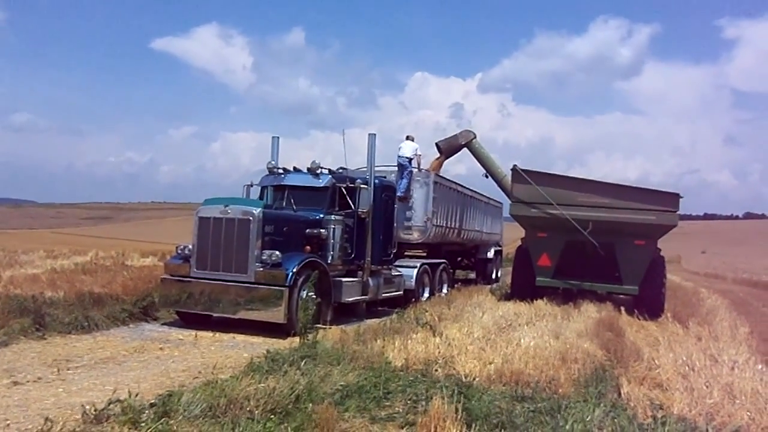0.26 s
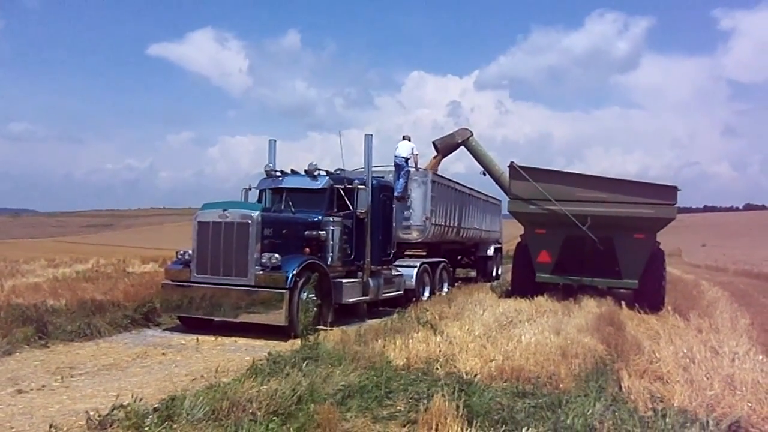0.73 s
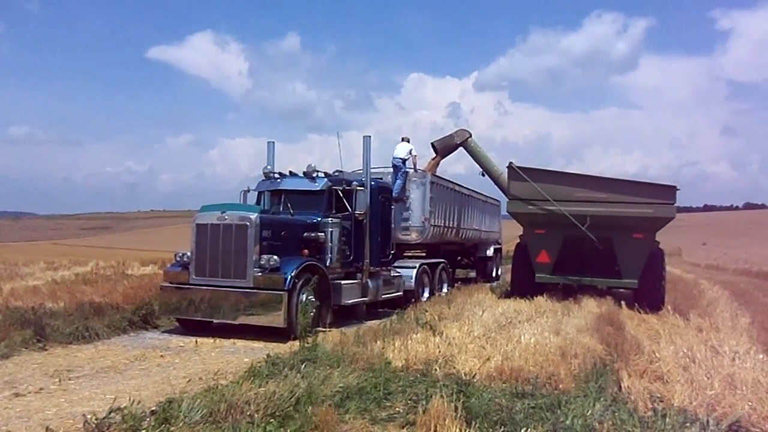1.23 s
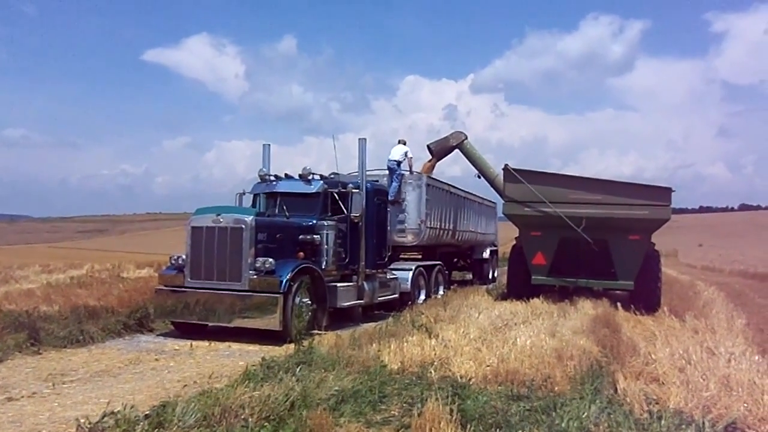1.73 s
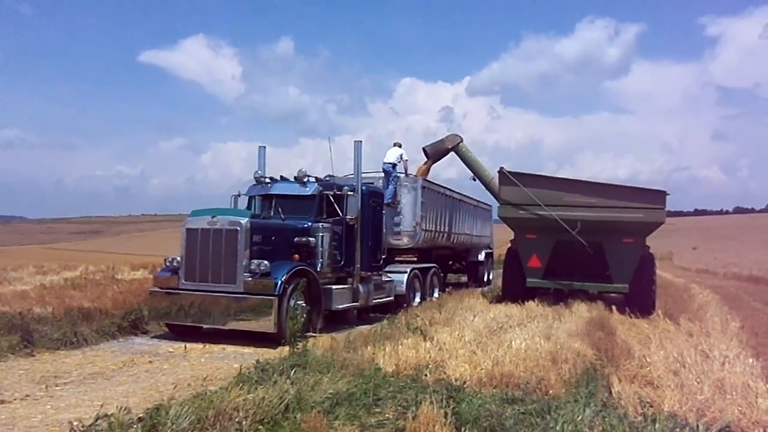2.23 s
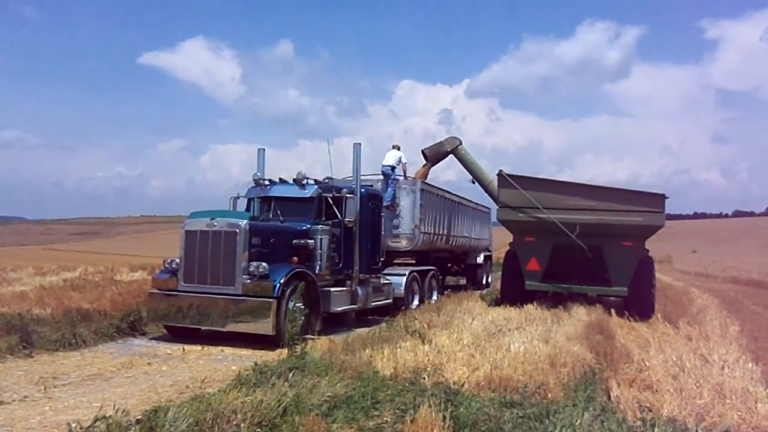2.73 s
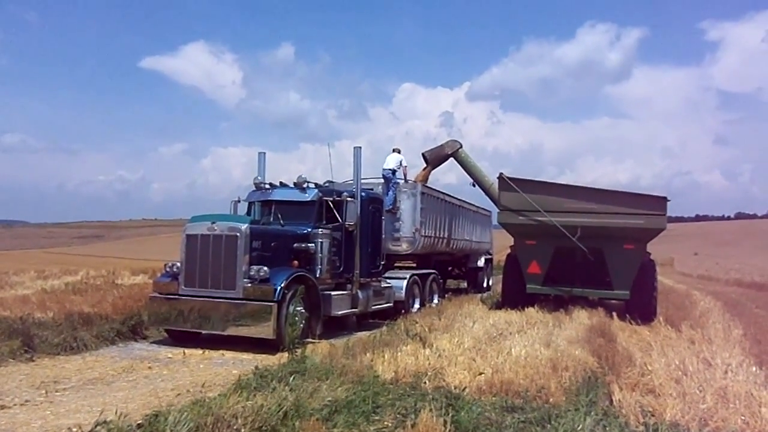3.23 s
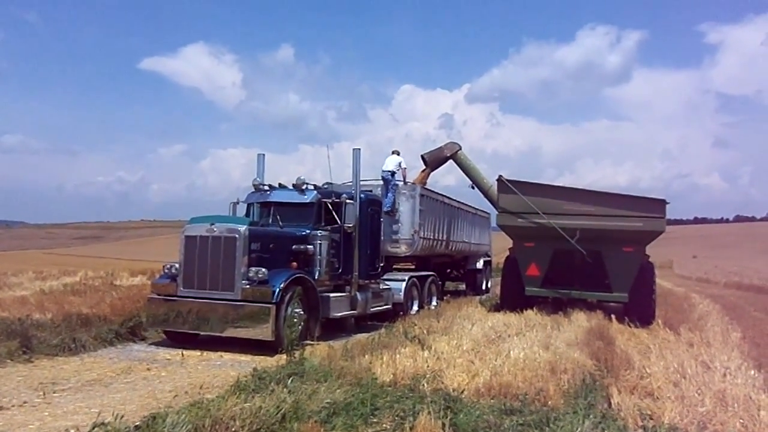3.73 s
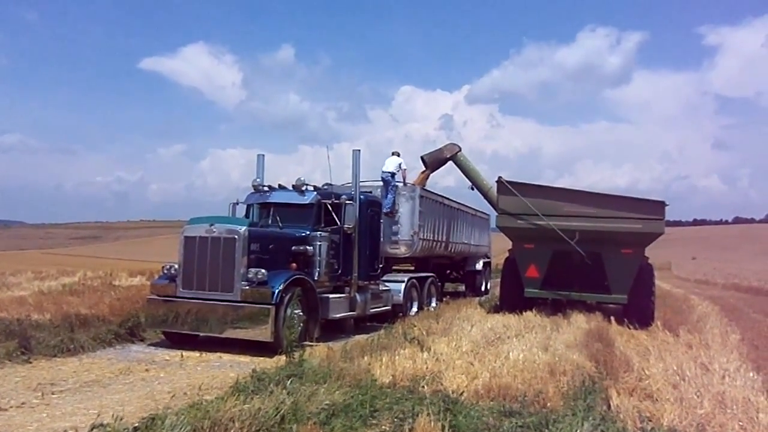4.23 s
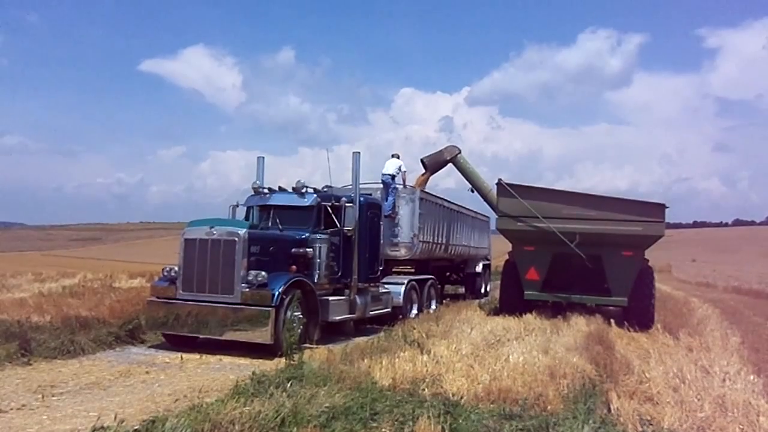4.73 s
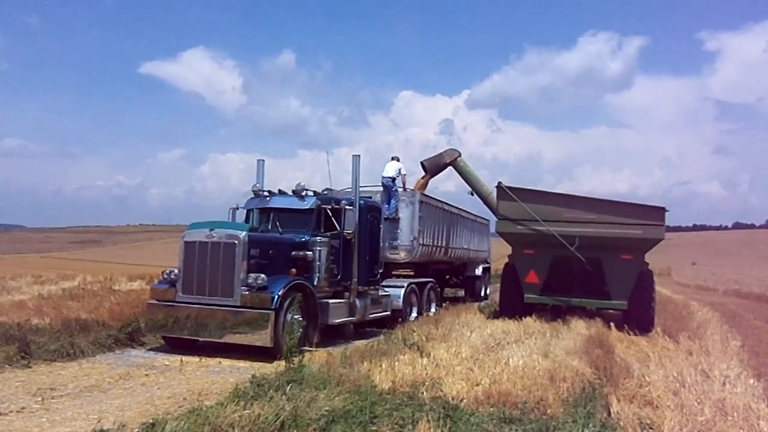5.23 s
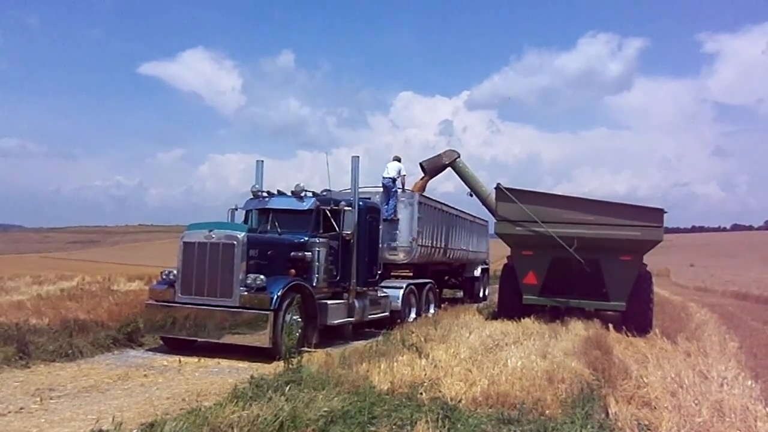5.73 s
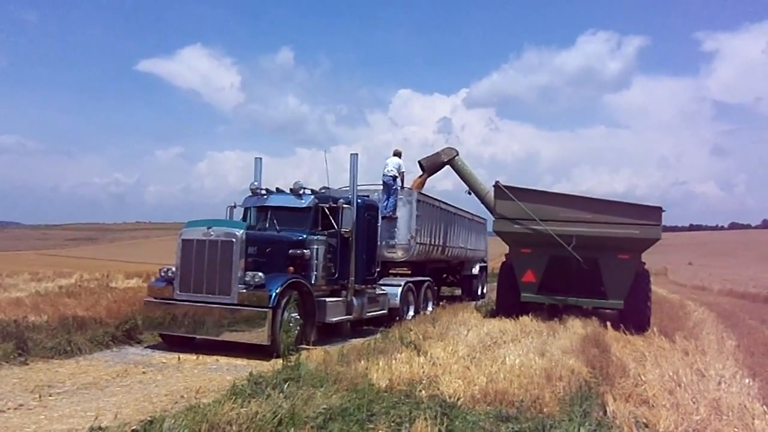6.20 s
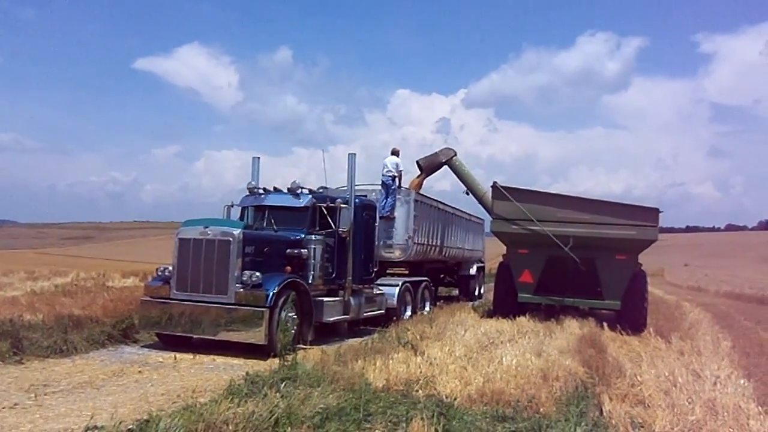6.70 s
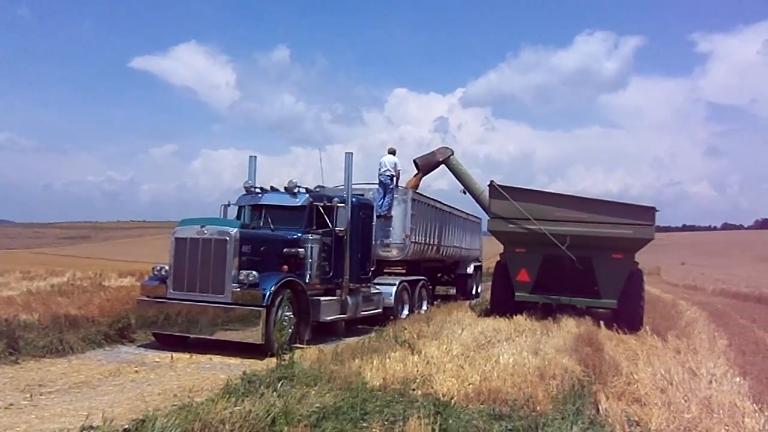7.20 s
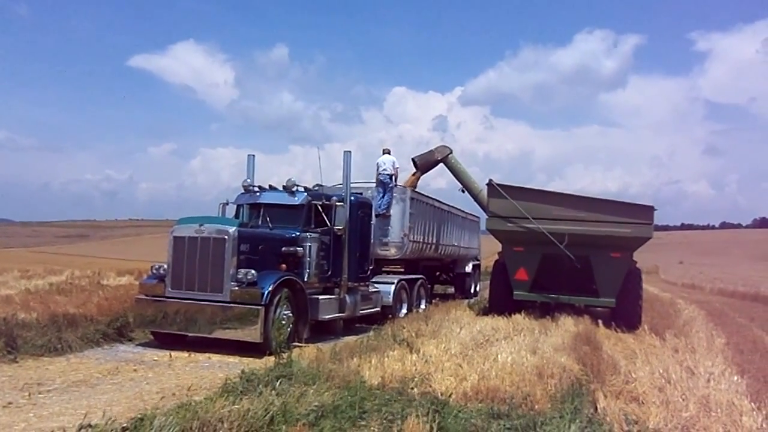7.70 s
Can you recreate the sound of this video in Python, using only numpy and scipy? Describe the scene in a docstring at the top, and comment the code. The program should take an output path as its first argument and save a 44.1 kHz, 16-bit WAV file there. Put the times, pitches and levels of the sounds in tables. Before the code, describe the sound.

A continuous outdoor machinery bed: bright flickering grain hiss, rattling diesel knock, low beating hum from truck and tractor, faint pump and gear whines. Low wind rumble and blunt pressure thumps hit the bare single microphone from the start, with a distorted burst near two and a half seconds. By three seconds the machines sound softer, their deep hum reduced less, and they keep running.

```python
"""A grain cart empties wheat into a truck trailer in an open field, heard on one microphone.
From the start grain hisses as flickering noise, the truck's six-cylinder diesel clatters as struck resonances,
gears, pumps and fans whine, and two engines drone as harmonic sines, the tractor firing faster than the truck.
Wind noise buffets the bare microphone throughout; thumps of pressure begin within half a second and are
strongest near 2.4 s. Between 1.9 and 3 s the machines sink in level, their deep tones less than the rest."""
import sys
import numpy as np
from scipy import signal
from scipy.io import wavfile
from scipy.ndimage import uniform_filter1d

SR = 44100
rng = np.random.default_rng(int(sys.argv[2]) if len(sys.argv) > 2 else 0)


def store_pcm(level_fs):
    """Save levels as 16-bit WAV."""
    pcm = np.round(np.clip(level_fs, -1, 1) * 32767).astype(np.int16)
    wavfile.write(sys.argv[1], SR, np.atleast_2d(pcm).T)


N = 350595

# firing rate [Hz] and time of the first firing [s]
TRUCK_FIRING_HZ, TRUCK_FIRST_S = 32.472, .0165
TRACTOR_FIRING_HZ, TRACTOR_FIRST_S = 75.975, .0021


def amp(db):
    """Level to amplitude ratio: 20 dB are a factor of ten."""
    return 10 ** (np.asarray(db) / 20)


def rms_one(x):
    """Normalization of signal power: scale to rms 1."""
    return x / np.sqrt(np.mean(x ** 2) + 1e-20)


def in_time(rows):
    """Linear interpolation: the columns of a curve at every sample."""
    s, *columns = np.transpose(rows)
    return [np.interp(np.arange(N) / SR, s, c) for c in columns]


def drift(rate_hz):
    """Low-pass random fluctuation: noise through two equal poles at rate_hz, rms 1."""
    step = 40   # samples between the computed points
    r = np.exp(-2 * np.pi * rate_hz * step / SR)
    white = rng.standard_normal(N // step + 2002)
    slow = signal.lfilter([1], [1, -2 * r, r * r], white)[2000:]   # drop the filter's settling
    return np.interp(np.arange(N) / step, np.arange(len(slow)), rms_one(slow - slow.mean()))


def resonance(x, hz, width_hz):
    """Damped resonator: a pole pair with gain 1 at its peak; the damping sets the width."""
    r = np.exp(-np.pi * width_hz / SR)
    zeros = np.array([1, 0, -1]) * (1 - r * r) / 2
    poles = [1, -2 * r * np.cos(2 * np.pi * hz / SR), r * r]
    return signal.lfilter(zeros, poles, x)


def band(x, low_hz, high_hz):
    """Band limitation by a Butterworth filter."""
    return signal.sosfilt(signal.butter(2, [low_hz, high_hz], "band", fs=SR, output="sos"), x)


def evened(x, span_s):
    """Envelope normalization: noise with its slow swells divided out."""
    return x / np.sqrt(uniform_filter1d(x ** 2, int(span_s * SR)) + 1e-12)


def patchy_noise(spectrum, shared_db, own_db):
    """Modulated noise: third-octave bands flicker partly together and partly alone; rms 1."""
    hz, level_db = np.transpose(spectrum)
    edges = hz[0] * 2 ** np.arange(0, np.log2(hz[-1] / hz[0]) + 1 / 3, 1 / 3)
    white, together, out = rng.standard_normal((2, N)), drift(4.6), 0
    for k, (low, high) in enumerate(zip(edges, edges[1:])):
        centre_db = np.interp(np.log(low * high) / 2, np.log(hz), level_db)
        gain = amp(centre_db + shared_db * together + own_db * drift(17.0))
        out = out + gain * band(white[k % 2], low, high)   # neighbours draw on different noise
    return rms_one(out)


def orders(hz, first_s, table, waver_db, wander_turns, sink_db=0):
    """Harmonics of a periodic source: sines on multiples of one wandering phase, each wavering in level."""
    spared_below_hz = 135.   # deep tones take a smaller share of the sink
    turns = hz * (np.arange(N) / SR - first_s) + wander_turns * drift(0.98)
    out = 0
    for k, db in table:
        share = 1 / (1 + (spared_below_hz / (k * hz)) ** 2)
        level = amp(db + share * sink_db + waver_db * drift(1.55))
        out = out + level * np.cos(2 * np.pi * round(k) * turns)
    return np.sqrt(2) * out   # rms to peak


def grain_stream():
    """Random superposition: the many impacts of falling wheat add up to flickering noise."""
    # spectrum of the wheat stream: (frequency [Hz], relative density [dB per Hz])
    spectrum = [(1700, -23), (2300, -8), (2700, -3.5), (3600, -4.5), (4500, 0.5), (6400, 0), (7800, -2.5),
                (8800, -10.5), (11000, -5), (16000, -19)]
    return amp(0.56) * patchy_noise(spectrum, shared_db=0.56, own_db=0.66)


def knocks(knock_s, spread_db):
    """Impulsive excitation: a short swell at each truck firing, uneven by cylinder and by chance; rms 1."""
    # strength of each cylinder in firing order: [dB]
    cylinders_db = [-6, -3, 0, -7, -5, -1]
    at = np.arange(TRUCK_FIRST_S, N / SR - .01, 1 / TRUCK_FIRING_HZ)
    chance = np.minimum(rng.standard_normal(len(at)), 1.4)
    firing = np.zeros(N)
    firing[(at * SR).astype(int)] = amp(np.resize(cylinders_db, len(at)) + spread_db * chance)
    r = np.exp(-1 / (knock_s * SR))   # each swell peaks after knock_s
    return rms_one(signal.lfilter([1], [1, -2 * r, r * r], firing))


def clatter(steady, roar_depth):
    """Modal excitation: noise rings the block, harder at each firing, over a roar that pulses slightly."""
    # engine block and panels: (frequency [Hz], noise bandwidth [Hz], relative level [dB], knock spread [dB])
    modes = [(427, 108, -6, 5.5), (637, 85, -0.5, -4), (922, 122, -3, -2), (1085, 95, -2, 5),
             (1450, 157, -6.5, 5), (1962, 170, -8.5, 3.5), (3040, 216, -10, 9.5)]
    # engine and auger noise: (frequency [Hz], relative density [dB per Hz])
    roar_spectrum = [(50, -19), (90, -10.5), (160, -4), (230, -18.5), (340, -21), (600, -11.5), (1100, -16),
                     (1300, -17.5), (2000, -21), (2300, -34.5), (3200, -55)]
    white, block = rng.standard_normal(N), 0
    for k, (hz, width_hz, db, spread_db) in enumerate(modes):
        shaking = white * (steady + knocks(knock_s=0.0096, spread_db=spread_db))
        pole_width_hz = 1.27 * width_hz   # two passes narrow the peak
        once = resonance(shaking, hz, pole_width_hz)
        ringing = resonance(once, hz, pole_width_hz)
        block = block + (-1) ** k * amp(db) * ringing
    pulsing = 0.5 + roar_depth * knocks(knock_s=0.0031, spread_db=8.5)
    roar = patchy_noise(roar_spectrum, shared_db=1.0, own_db=0.7) * pulsing
    return amp(-2.0) * rms_one(block) + amp(1.0) * rms_one(roar)


def whines():
    """Gear mesh harmonics, and narrow-band noise from resonators for pumps and fans."""
    gear_hz = 157.9   # mesh rate
    # gear overtones: (multiple of the mesh rate, relative rms level [dB])
    gear_orders = [(2, -18.5), (3, -15), (4, -13.5), (6, -21), (9, -19.5), (10, -23.5)]
    # pumps and fans: (frequency [Hz], relative rms level [dB], width [Hz])
    noisy_tones = [(599.6, -14, 6), (722, -15.5, 16), (861.4, -10.5, 11), (1071, -15, 9.7),
                   (1172, -17.5, 4), (6550, -15.5, 32)]
    gears = orders(gear_hz, 0, gear_orders, waver_db=4., wander_turns=.22)
    white = rng.standard_normal(N)
    return gears + sum(amp(db) * rms_one(resonance(white, hz, width)) for hz, db, width in noisy_tones)


def exhausts(sink_db):
    """Superposition of two harmonic series: the loudest exhaust tones lie 11 Hz apart and beat."""
    # exhaust tones: (multiple of the firing rate, rms level before the sink [dB])
    truck_orders = [(1, -46), (2, -31.5), (3, -45), (4, -48), (5, -46)]
    tractor_orders = [(1, -31.5), (2, -33.5), (3, -55)]
    truck = orders(TRUCK_FIRING_HZ, TRUCK_FIRST_S, truck_orders, .9, .008, sink_db)
    tractor = orders(TRACTOR_FIRING_HZ, TRACTOR_FIRST_S, tractor_orders, .9, .012, sink_db)
    return truck + tractor


def gusts():
    """Turbulence intensity: levels of rumble and flutter in an uneven breeze, with gusts added on top."""
    # breeze between the gusts: (time [s], mean rumble level [dB], mean flutter level [dB])
    breeze = [(0.0, -33, -46), (0.66, -26.5, -44), (1.0, -37, -46), (1.7, -29, -45), (2.08, -27, -46),
              (2.26, -23.5, -42), (3.41, -32, -45), (4.27, -25.5, -44.5), (5.0, -29.5, -44),
              (5.14, -28.5, -47), (5.6, -27, -45.5), (5.78, -41, -45), (6.31, -39, -48.5), (6.64, -30, -49),
              (7.04, -35, -48), (7.42, -27.5, -51), (7.59, -35, -45), (7.95, -36, -45)]
    # gusts that rise, hold and fall: (start [s], hold [s], added rumble [dB], added flutter [dB])
    gust_rows = [(0.326, 0.025, -22, -43), (0.756, 0.038, -38, -34.5), (1.765, 0.048, -33, -29.5),
                 (2.102, 0.046, -23, -20.5), (2.245, 0.098, -24.5, -31.5), (2.36, 0.12, -17.5, -13.5),
                 (2.518, 0.022, -19.5, -32), (2.839, 0.066, -18.5, -33.5), (3.402, 0.017, -21, -43),
                 (3.915, 0.088, -29, -49), (4.125, 0.048, -27, -40), (4.474, 0.033, -25.5, -36),
                 (5.078, 0.09, -27, -48), (6.543, 0.027, -28, -35.5), (6.937, 0.096, -22.5, -42),
                 (7.558, 0.038, -29, -47)]
    rise_s, fall_s, lumps_db = 0.031, .03, 2.5
    breeze_db, breeze_flutter_db = in_time(breeze)
    rumble = amp(breeze_db + lumps_db * drift(8.5))
    flutter = amp(breeze_flutter_db + lumps_db * drift(8.9))
    for start_s, hold_s, rumble_db, flutter_db in gust_rows:
        corners = start_s + np.cumsum([0, rise_s, abs(hold_s), fall_s])
        swell = np.interp(np.arange(N) / SR, corners, [0, 1, 1, 0]) ** 2
        rumble = rumble + amp(rumble_db) * swell
        flutter = flutter + amp(flutter_db) * swell
    return rumble, flutter


def thumps(eddies):
    """Pressure pulses: a pull between two pushes sweeps smaller eddies aside, with a rasp on its edge."""
    # thumps of wind: (time [s], swing level [dB], pitch [Hz], rasp level [dB])
    thump_rows = [(0.362, -23, 75.4, -18), (0.65, -20, 75.4, -27), (0.759, -23, 59.2, -31),
                  (1.186, -18.5, 51.6, -28.5), (1.793, -13, 85.6, -34), (1.923, -16, 70.5, -21),
                  (2.135, -8, 213, -17), (2.16, -6, 62, -25), (2.414, -4, 143, -14.5),
                  (2.452, -9, 231, -19), (2.497, -18, 227, -11), (2.837, -13, 54.6, -32),
                  (2.87, -6, 54, -16.5), (2.893, -8, 59.2, -15.5), (3.439, -30, 59.2, -26.5),
                  (4.001, -19, 59.2, -44), (4.167, -15.5, 51.4, -31), (4.524, -19, 51, -30),
                  (5.17, -8, 51.1, -17.5), (5.325, -11, 107, -29), (5.434, -17, 111, -41),
                  (6.695, -13, 61.9, -38), (6.737, -20, 146, -34), (6.828, -27, 67.3, -28),
                  (6.951, -13.5, 61.9, -25.5), (7.006, -22, 67.3, -34), (7.048, -31, 75.4, -26)]
    cycles, lopsided_turns, rasp_s, rasp_lead_s = 1.66, 0.044, 0.023, 0.0036
    white, out = rng.standard_normal((2, N)), eddies.copy()
    rasp = evened(band(white[0], 88.0, 258.0), span_s=0.0104)
    crackle = rms_one(band(white[1], 380.0, 1500.0))
    edge = np.hanning(int(rasp_s * SR))
    for (s, db, hz, rasp_db), chance in zip(thump_rows, rng.standard_normal(len(thump_rows))):
        size = int(cycles / hz * SR)
        turns = hz * (np.arange(size) - size / 2) / SR + lopsided_turns * chance
        swing = -np.cos(2 * np.pi * turns)
        start = int(s * SR) - size // 3
        at = slice(start, start + size)
        out[at] += np.hanning(size) * (amp(db) * swing - 0.36 * out[at])
        start = int((s - rasp_lead_s) * SR)
        at = slice(start, start + len(edge))
        # strong rasps are brighter
        out[at] += edge * amp(rasp_db) * (rasp[at] + 0.65 * amp(rasp_db) * crackle[at])
    return out


def wind():
    """Turbulent pressure on the microphone: lumpy rumble, brighter flutter in the gusts, single thumps."""
    rumble_level, flutter_level = gusts()
    white = rng.standard_normal((2, N))
    rumble = rumble_level * evened(band(white[0], 6.7, 68.7), span_s=0.071)
    flicker = amp(3.0 * drift(27.0))
    flutter = flutter_level * flicker * evened(band(white[1], 75.0, 260.0), span_s=0.034)
    # the steep power leaves this high band mainly to the strongest gusts
    roar = amp(-0.5) * flutter_level ** 1.78 * rms_one(band(white[0], 240.0, 680.0))
    return thumps(rumble + flutter + roar)


def scene():
    """Linear superposition: all sources add at one microphone, alike in both channels."""
    # level of grain, clatter and whines: (time [s], level [dB])
    machine_curve = [(0.0, -30), (1.88, -31), (2.39, -32.5), (2.44, -35), (2.83, -37), (2.97, -39.5),
                     (5.91, -40.5), (6.15, -41.5), (7.0, -40.5), (7.26, -42), (7.95, -37.5)]
    machines_db, = in_time(machine_curve)
    machines = amp(machines_db) * (grain_stream() + clatter(steady=0.62, roar_depth=0.11) + whines())
    engines = exhausts(machines_db - machines_db[0])
    return np.tile(machines + engines + wind(), (2, 1))


def record(dry):
    """Soft saturation, then low-pass filtering: the loudest gusts overload the input; the top is cut."""
    top, cutoff_hz = 0.52, 13950   # largest amplitude the input can pass, and band limit
    clipped = dry / (1 + np.abs(dry / top) ** 4) ** .25
    return signal.sosfilt(signal.ellip(14, .3, 70, cutoff_hz, fs=SR, output="sos"), clipped)


dry = scene()
out = record(dry)
store_pcm(out)
```